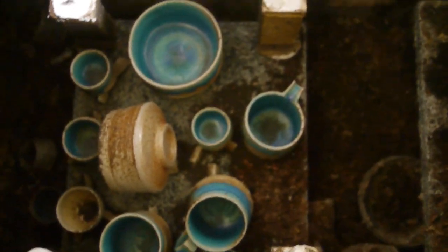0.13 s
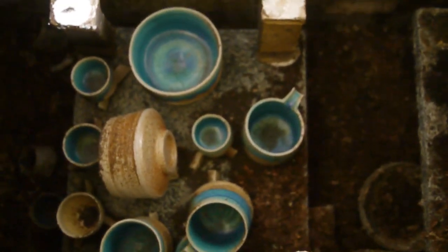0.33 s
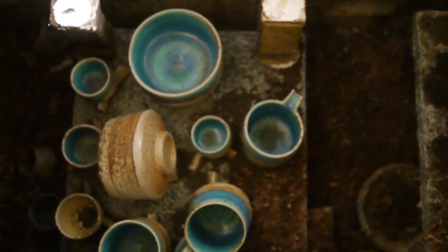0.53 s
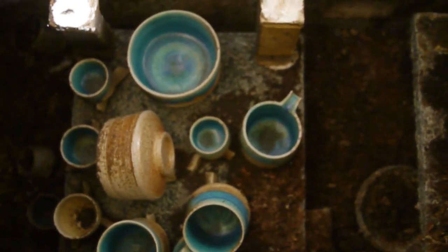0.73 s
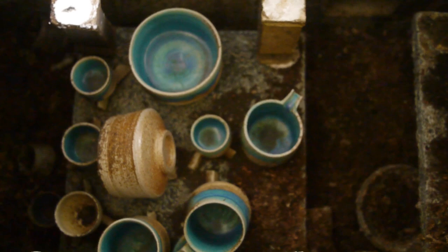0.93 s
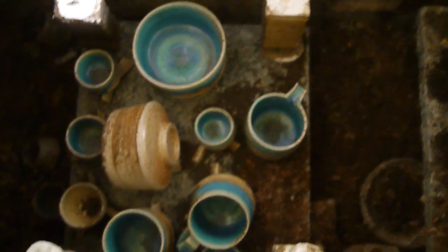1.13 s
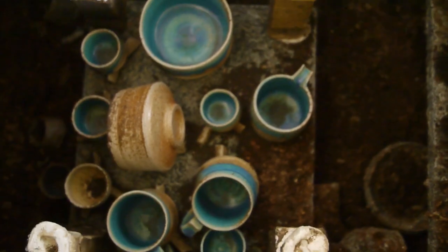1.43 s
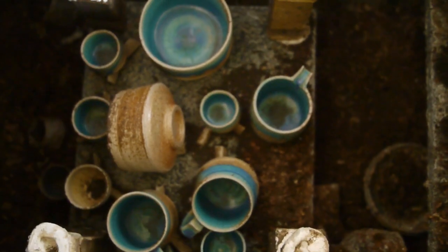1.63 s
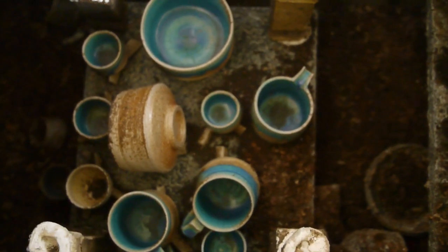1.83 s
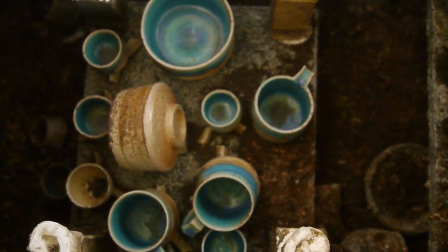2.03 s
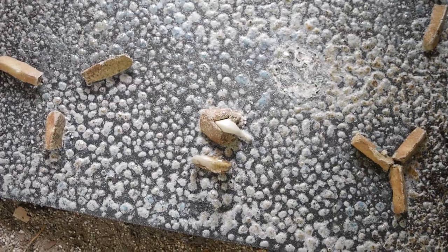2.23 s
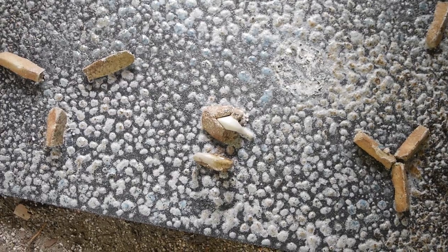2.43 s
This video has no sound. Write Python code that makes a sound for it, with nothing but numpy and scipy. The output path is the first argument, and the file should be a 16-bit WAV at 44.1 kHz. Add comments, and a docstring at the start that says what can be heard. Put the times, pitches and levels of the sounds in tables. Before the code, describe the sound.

Ceramic pots knock lightly, close up in a small kiln with a short echo, then a mug clatters hard and rings at about 0.4 seconds. From 0.7 to 1.2 seconds a bowl scrapes twice over clay grit. Chips tick amid light brushing until the bowl lands with a ringing thump near 1.9 seconds. After 2.2 seconds, a few faint, sharp clicks sound in quieter open air.

```python
"""Pots in a small brick kiln

Close on a shelf, with a stereo pair; the walls answer each contact with a dense, short echo.
Fired pots knock a few times and clatter once, hard; a bowl is dragged twice over clay grit,
brushed along and set down with a thump. Then the kiln's air gives way to a quieter open space,
where a few faint, sharp clicks sound."""
import sys
import numpy as np
from scipy import signal
from scipy.fft import rfft, irfft
from scipy.io import wavfile
from scipy.ndimage import uniform_filter1d

SR = 44100
rng = np.random.default_rng(int(sys.argv[2]) if len(sys.argv) > 2 else 0)


def to_wav(s):
    """Save 16-bit WAV."""
    ch = np.atleast_2d(s).T  # columns
    pcm = np.round(np.clip(ch, -1, 1) * 32767)  # PCM
    wavfile.write(sys.argv[1], SR, pcm.astype(np.int16))


N = 114660
T = np.arange(SR) / SR  # time axis of one contact, a second long
HZ = np.fft.rfftfreq(SR, 1 / SR)
LEAVE_S = 2.178  # from the kiln into the open

# modes of the bowl (frequency [Hz], relative level struck [dB], relative level rubbed [dB], t60 [s])
BOWL_MODES = [(690, -11, -9, .1), (890, -4.5, -3.5, .14), (1125, 0, -0.5, .14), (1185, -9, -5, .13),
              (1340, -18, -28, .4), (1785, -13, -13, .17), (1892, -12, 1, .15), (1979, 3, -0.5, .15),
              (2083, -16, -9, .1), (2175, -9, -6, .11), (4636, -17, -24, .24)]


def amp(db):
    """Decibels to gain."""
    return 10 ** (np.asarray(db) / 20)


def unit_rms(x):
    """Scales to rms 1."""
    return x / np.sqrt(np.mean(x ** 2) + 1e-20)


def read(points, hz=HZ):
    """Reads a table on a log-frequency axis."""
    f, value = np.transpose(points)
    return np.interp(np.log(hz + 1), np.log(f), value)


def curve(points):
    """Gain over time from (time [s], level [dB]) points."""
    return amp(np.interp(np.arange(N) / SR, *np.transpose(points)))


def add(mix, s, sound):
    """Mixes a sound in at time s."""
    part = mix[:, max(round(s * SR), 0):][:, :sound.shape[1]]
    part += sound[:, :part.shape[1]]


def tilted(colour, db_per_octave):
    """A colour in dB, made brighter or duller about 2 kHz."""
    return read(colour) + db_per_octave * np.log2(np.maximum(HZ, 200) / 2000)


def hump(hz, octaves):
    """Colour in dB of one resonance, 6 dB down at `octaves` to either side."""
    return -20 * np.log10(1 + (np.log2((HZ + 1) / hz) / octaves) ** 2)


def through(clicks, response):
    """Plays clicks through a response scaled to unit energy."""
    return signal.fftconvolve(clicks[None], unit_rms(response) / np.sqrt(SR), axes=1)[:, :N]


def diffuse(size):
    """Noise as two close microphones hear it: alike in the bass, unrelated in the treble."""
    # likeness of left and right (frequency [Hz], correlation [0-1])
    likeness = [(60, 0.93), (300, 0.88), (700, 0.61), (1400, 0.68), (3100, 0.26), (7000, 0.049)]
    left, unrelated = rfft(rng.standard_normal((2, size)))
    same = np.clip(read(likeness, np.fft.rfftfreq(size, 1 / SR)), -1, 1)
    right = same * left + np.sqrt(1 - same ** 2) * unrelated
    return irfft(np.array([left, right]), size)


def contact(colour_db, direct=0.28, decay=1, ripple_db=7):
    """A direct click, then dense wall echoes that die band by band; rms 1 over the first 20 ms."""
    # the kiln's reverberation (frequency [Hz], t60 at decay=1 [s])
    kiln_t60 = [(80, 0.77), (260, 0.59), (700, 0.24), (2000, 0.19), (5000, 0.18), (14000, 0.21)]
    hz, t, bands = signal.stft(diffuse(SR), SR, nperseg=256)
    t60 = decay * read(kiln_t60, hz)[:, None]
    response = signal.istft(bands * amp(-60 * t / t60), SR, nperseg=256)[1][:, :SR]
    uneven = amp(np.exp(-T / 0.013) * np.clip(rng.standard_normal(SR), -2, 2))  # first wall echoes
    response *= uneven / np.sqrt(uniform_filter1d(uneven ** 2, size=200))
    response[:, 0] += direct * np.linalg.norm(response[0])
    # narrow resonances of the shelf, different at each spot and weaker in the bass
    ripple = np.interp(HZ / 69.86, np.arange(len(HZ)), rng.standard_normal(len(HZ)))
    shade_db = colour_db + ripple_db * HZ / (HZ + 820) * ripple
    log_gain = np.log(amp(np.r_[shade_db, shade_db[-2:0:-1]]))
    minimum_phase = np.exp(np.conj(signal.hilbert(log_gain)))[:len(HZ)]
    out = irfft(rfft(response) * minimum_phase)
    return out / np.sqrt(np.mean(out[:, :SR // 50] ** 2))


def ring(modes, build_s=0.00024):
    """A pot's decaying modes, swelling briefly as they fill the kiln."""
    out, power = np.zeros((2, SR)), 0
    for hz, db, t60 in modes:
        phase = 2 * np.pi * rng.random() + 0.97 * rng.standard_normal((2, 1))  # one per microphone
        out += amp(db - 60 * T / t60) * np.sin(2 * np.pi * hz * T + phase)
        power += amp(db) ** 2 / 2
    return out * (1 - np.exp(-T / build_s)) / np.sqrt(power)


def slips(per_s=600, spread_db=7):
    """Random stick-slip clicks of uneven size."""
    size = amp(spread_db * np.minimum(rng.exponential(1, N), 3))
    sign = rng.choice([-1, 1], N)
    return unit_rms(size * sign * (rng.random(N) < per_s / SR))


def mug_clatter():
    """Three hard blows in quick succession set a mug ringing."""
    # blows (time [s], level [dB], ring level [dB])
    blows = [(0.357, -21, -18.5), (0.363, -31, -34.5), (0.386, -30.5, -33.5)]
    # colour of a blow (frequency [Hz], relative level [dB])
    colour = [(50, -24), (200, -24), (600, -4), (1200, 0), (1900, -2), (2450, 6), (2900, 3), (3780, 6),
              (4300, -7), (6500, -10), (8000, -20), (15000, -30.5)]
    # modes of the mug (frequency [Hz], relative level [dB], t60 [s])
    modes = [(1265, -14, .3), (2302, -5.5, .32), (2473, -3.5, .14), (3024, -17, .9), (3363, -5, .2),
             (3502, -11, .3), (3600, 0, .18), (3648, -1, .16), (3713, 0, .16), (3790, 2, .13)]
    out = np.zeros((2, N))
    for s, db, ring_db in blows:
        add(out, s, amp(db) * contact(read(colour)) + amp(ring_db) * ring(modes))
    return out


def bowl_drag():
    """The bowl's foot sticks and slips over grit, which sets the bowl ringing."""
    # force of the drag (time [s], level [dB])
    drag = [(0.66, -63), (0.675, -38), (0.72, -29), (0.745, -33.5), (0.77, -31), (0.82, -43.5),
            (0.925, -49.5), (0.965, -43), (1.01, -37), (1.04, -34), (1.12, -31), (1.165, -23.5),
            (1.19, -69), (1.222, -30), (1.24, -93)]
    # colour of grinding grit (frequency [Hz], relative level [dB])
    colour = [(40, -26), (85, -14), (330, -1), (450, -10), (680, -0.5), (790, -16), (1120, -3), (1450, -2),
              (2000, 4.5), (2900, 0.5), (5200, -4), (8500, -5), (10000, -15), (15000, -21.5)]
    force, grains = curve(drag), slips()
    rubbed = [(hz, db, t60) for hz, _, db, t60 in BOWL_MODES]
    grit = through(force * grains, contact(read(colour), decay=0.72, ripple_db=1.4))
    # the ring grows more slowly than the force, so light rubbing sounds purer
    bowl = through(force ** 0.84 * grains, ring(rubbed))
    return amp(-3.5) * grit + amp(-9.5) * bowl


def bowl_catches():
    """The bowl catches on grit or lands, and rings from the blow."""
    # catches and landings (time [s], level [dB], tilt [dB/octave], ring level [dB])
    catches = [(0.724, -47, -6, -32.5), (0.769, -50, 0, -31), (0.886, -47.5, -4, -47),
               (1.083, -46.5, 2, -29.5), (1.151, -36.5, -2.5, -29), (1.163, -44, 1, -46),
               (1.8875, -33, -3, -24.5)]
    # colour of a landing (frequency [Hz], relative level [dB])
    colour = [(50, -11.5), (250, -1), (1100, -2.5), (2000, 10), (2800, 3), (6300, 4), (10000, -3),
              (15000, -17)]
    struck = [(hz, db, t60) for hz, db, _, t60 in BOWL_MODES]
    out = np.zeros((2, N))
    for s, db, tilt, ring_db in catches:
        add(out, s, amp(db) * contact(tilted(colour, tilt), decay=0.64) + amp(ring_db) * ring(struck))
    return out


def cup_knocks():
    """A cup knocks lightly on the shelf and rings, near and crisp."""
    # knocks (time [s], level [dB], tilt [dB/octave], ring level [dB])
    knocks = [(0.0, -42, -3, -48.5), (0.066, -40, -1, -54), (0.1923, -37, -1, -44.5), (0.204, -36, -1, -58),
              (0.249, -39, -3, -75), (0.2627, -45, -1, -66.5)]
    # colour of a knock (frequency [Hz], relative level [dB])
    colour = [(50, -32.5), (200, -16.5), (600, -5), (1400, 3.5), (3200, -0.5), (5000, -7), (7500, -17),
              (15000, -28)]
    # modes of the cup (frequency [Hz], relative level [dB], t60 [s])
    modes = [(1593, -10, .45), (3010, -10, .3), (3887, 0, .42), (4075, -10, .4), (4845, -15, .25)]
    out = np.zeros((2, N))
    for s, db, tilt, ring_db in knocks:
        add(out, s, amp(db) * contact(tilted(colour, tilt), direct=0.37) + amp(ring_db) * ring(modes))
    return out


def shelf_thumps():
    """The shelf gives a low push that booms in the kiln."""
    # thumps (time [s], level [dB], pitch [Hz])
    thumps = [(0.0, -53, 266), (0.359, -43.5, 291), (0.408, -47.5, 291), (1.145, -60, 250),
              (1.886, -49.5, 252), (1.931, -54.5, 104)]
    out = np.zeros((2, N))
    for s, db, hz in thumps:
        add(out, s, amp(db) * contact(hump(hz, octaves=0.32), direct=0.44))
    return out


def clay_bits():
    """Clay chips clink at one resonance each, and grit ticks dryly."""
    # clinks of chips (time [s], level [dB], pitch [Hz], half-width [octaves])
    chips = [(0.193, -44.5, 1484, 0.014), (0.2613, -38.5, 2950, 0.066), (0.426, -43.5, 5130, 0.08),
             (0.7177, -37.5, 6850, 0.036), (0.758, -39.5, 8400, 0.093), (1.148, -32, 7010, 0.026),
             (1.215, -51.5, 2197, 0.018), (1.308, -44, 2300, 0.033), (1.34, -41, 2830, 0.062),
             (1.367, -52.5, 5200, 0.23), (1.489, -60, 5060, 0.11), (1.628, -58, 5300, 0.098),
             (1.969, -58.5, 6400, 0.44), (2.444, -61.5, 12200, 0.0054)]
    # ticks of grit (time [s], level [dB], tilt [dB/octave])
    ticks = [(0.004, -49.5, 12.5), (0.564, -56.5, -3), (0.668, -42.5, 1), (0.7186, -34, 0.5),
             (1.309, -41, 2), (1.314, -43, 2.5), (1.778, -46.5, 4), (1.797, -45, 3.5), (1.8843, -39.5, 2),
             (2.023, -54.5, 5.5), (2.062, -61, 7)]
    # colour of a tick (frequency [Hz], relative level [dB])
    colour = [(100, -44.5), (700, 13), (870, -10.5), (1150, 13.5), (1500, -6), (2600, 8.5), (4000, -4),
              (8000, -9.5), (15000, -30)]
    out = np.zeros((2, N))
    for s, db, hz, octaves in chips:
        add(out, s, amp(db) * contact(hump(hz, octaves), decay=0.54))
    for s, db, tilt in ticks:
        add(out, s, amp(db) * contact(tilted(colour, tilt), decay=0.73))
    return out


def brushing():
    """Clay brushes lightly over the shelf in a run of tiny slips."""
    # strength of the brushing (time [s], level [dB])
    strength = [(0.05, -55.5), (0.15, -53.5), (0.18, -63.5), (0.53, -53), (0.58, -43.5), (0.61, -84),
                (0.64, -47.5), (1.37, -55.5), (1.42, -58), (1.59, -63), (1.64, -52.5), (1.675, -57.5),
                (1.71, -54.5), (1.76, -59.5), (1.8, -53.5), (1.87, -52.5), (1.95, -57), (2.15, -64),
                (2.2, -74), (2.33, -62.5), (2.42, -81.5)]
    # colour of the rubbing (frequency [Hz], relative level [dB])
    colour = [(100, -17), (700, 3), (1800, 6), (2800, 8), (3900, 1), (5500, 2.5), (8500, -5.5),
              (11000, -12), (15000, -20)]
    return through(curve(strength) * slips(), contact(read(colour), ripple_db=3.57))


def faint_clicks():
    """A few faint, sharp clicks sound in the open."""
    # faint sharp clicks (time [s], level [dB])
    clicks = [(2.256, -63.5), (2.4384, -61), (2.4443, -56)]
    # colour of a click (frequency [Hz], relative level [dB])
    colour = [(200, -29.5), (2000, -1), (4500, 9.5), (9000, -2), (15000, -9)]
    out = np.zeros((2, N))
    for s, db in clicks:
        add(out, s, amp(db) * contact(read(colour), direct=0.77, decay=0.97))
    return out


def air():
    """Faint steady air, first in the kiln and then in the open."""
    # room tone of the kiln (frequency [Hz], relative level [dB])
    kiln_air = [(30, -34), (130, 6), (2600, -1.5), (6000, -14), (15000, -62.5)]
    # air in the open (frequency [Hz], relative level [dB])
    open_air = [(30, -6), (150, -3.5), (700, -0.5), (2500, -8.5), (15000, -18.5)]
    hz = np.fft.rfftfreq(N, 1 / SR)
    inside = unit_rms(irfft(rfft(diffuse(N)) * amp(read(kiln_air, hz)), N))
    outside = unit_rms(irfft(rfft(diffuse(N)) * amp(read(open_air, hz)), N))
    return np.where(np.arange(N) / SR < LEAVE_S, amp(-63) * inside, amp(-66.5) * outside)


def scene():
    """All sources; the struck pots and the shelf fall silent on leaving the kiln."""
    in_kiln = np.clip((LEAVE_S - np.arange(N) / SR) / .005, 0, 1)
    pots = cup_knocks() + mug_clatter() + bowl_catches() + shelf_thumps()
    return pots * in_kiln + clay_bits() + faint_clicks() + bowl_drag() + brushing() + air()


def record(dry):
    """The left microphone hears slightly later and brighter; then a low cut and a band limit."""
    # balance of the pair (frequency [Hz], left minus right [dB])
    balance = [(200, -2.2), (1200, -1), (2600, 1.1), (8000, 1.1), (15000, 2)]
    left_lag_s, low_cut_hz, top_hz = 0.000045, 66, 15700
    hz = np.fft.rfftfreq(2 * N, 1 / SR)
    left = amp(read(balance, hz) / 2)
    pair = np.array([left * np.exp(-2j * np.pi * hz * left_lag_s), 1 / left])
    heard = irfft(rfft(dry, 2 * N) * pair)[:, :N]
    heard = signal.lfilter(*signal.butter(2, low_cut_hz, "high", fs=SR), heard)
    band_limit = signal.firwin(255, top_hz, window=("kaiser", 9), fs=SR)
    return signal.oaconvolve(heard, band_limit[None], "same")


dry = scene()
out = record(dry)
to_wav(out)
```